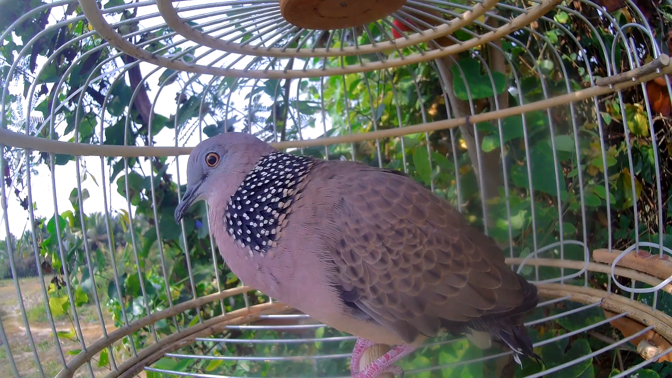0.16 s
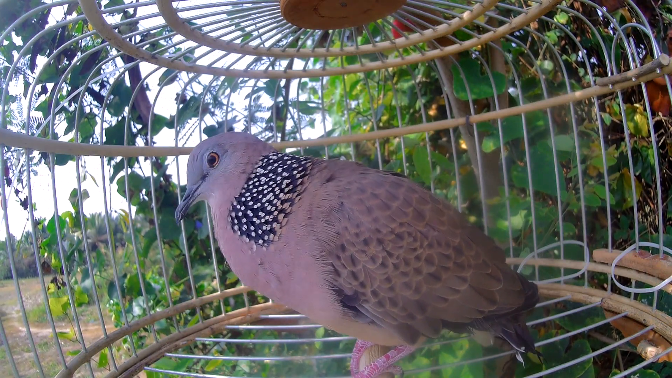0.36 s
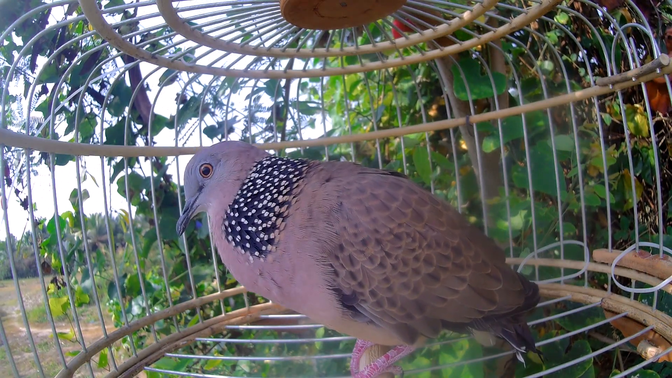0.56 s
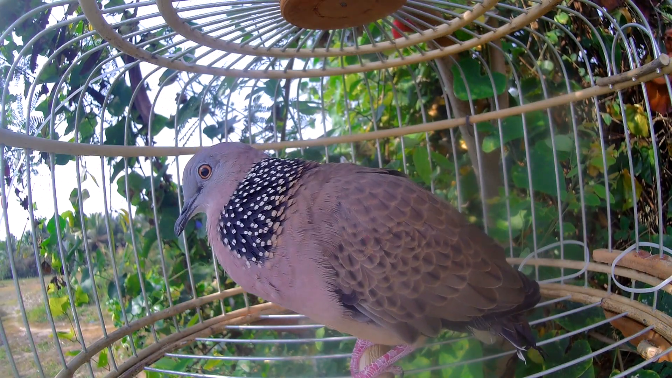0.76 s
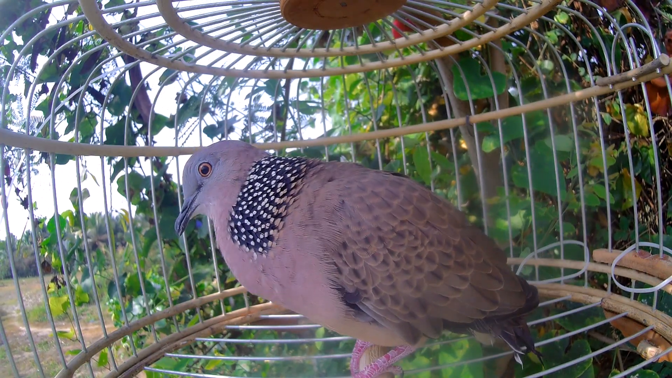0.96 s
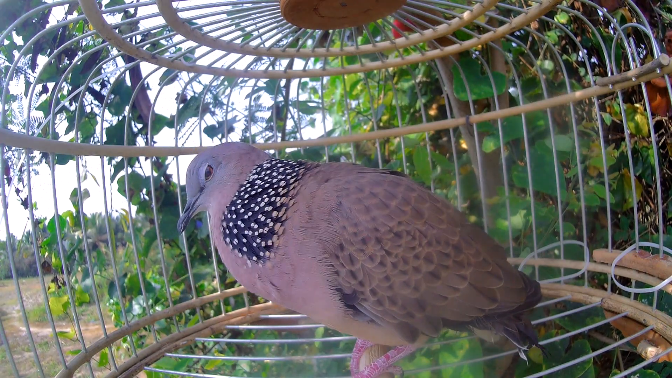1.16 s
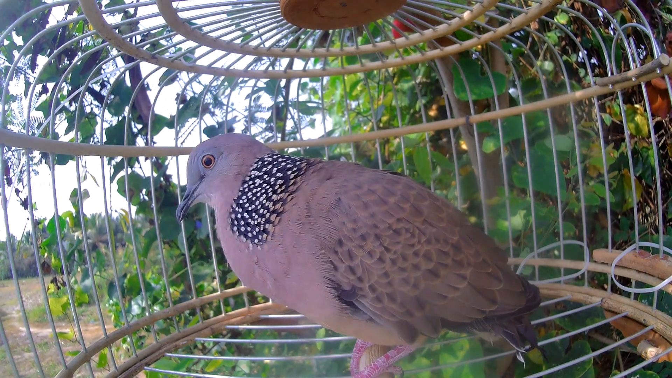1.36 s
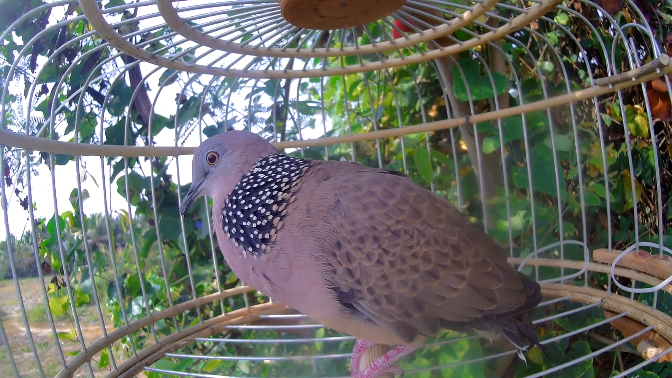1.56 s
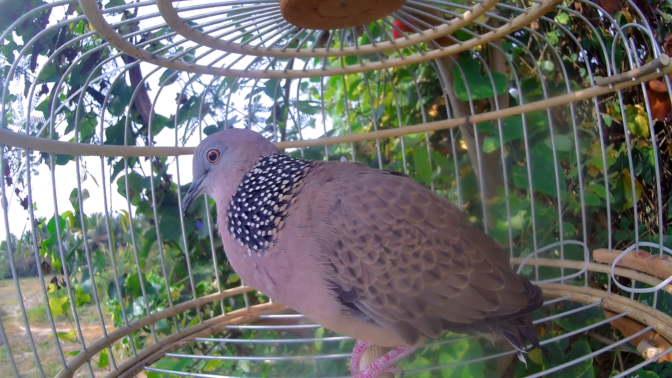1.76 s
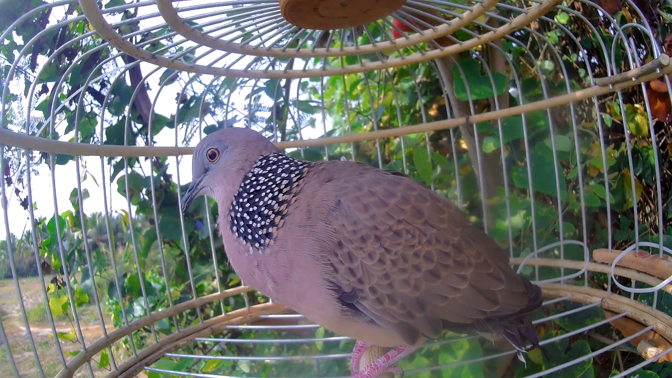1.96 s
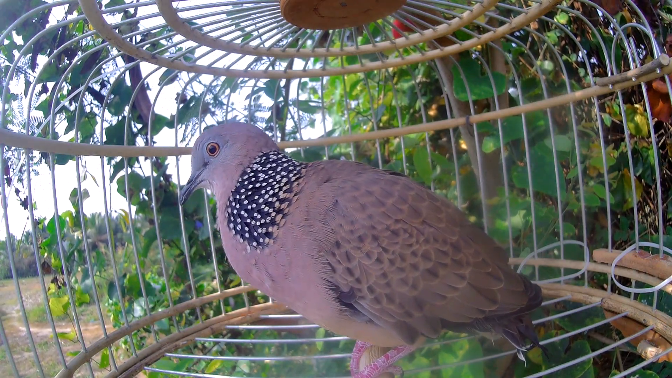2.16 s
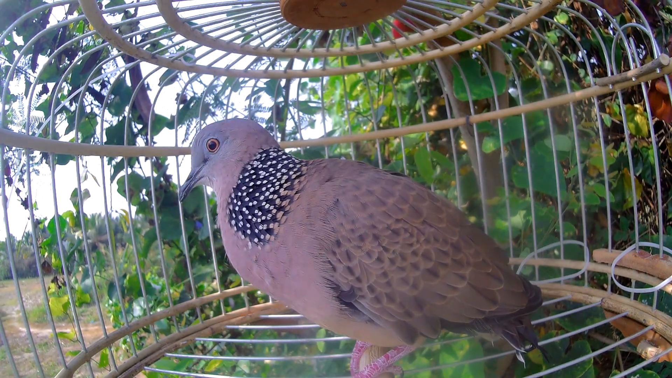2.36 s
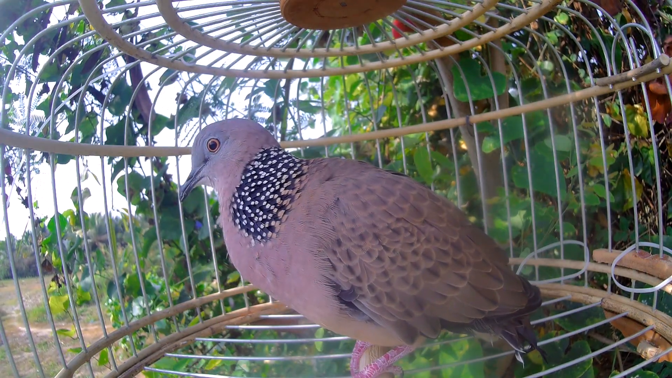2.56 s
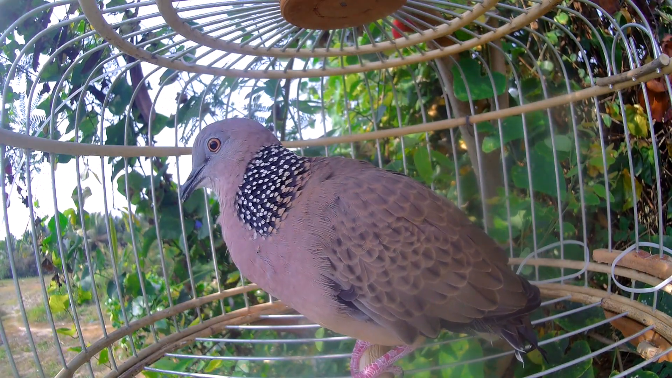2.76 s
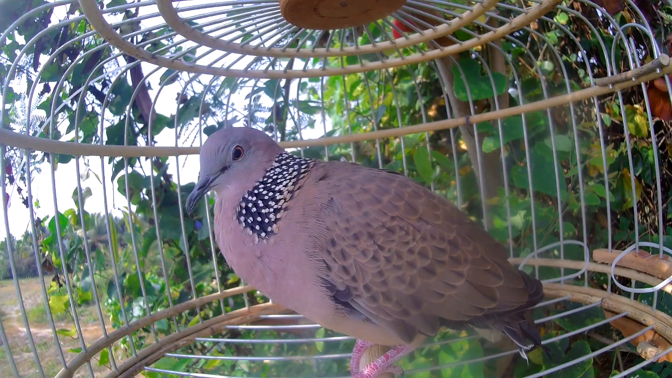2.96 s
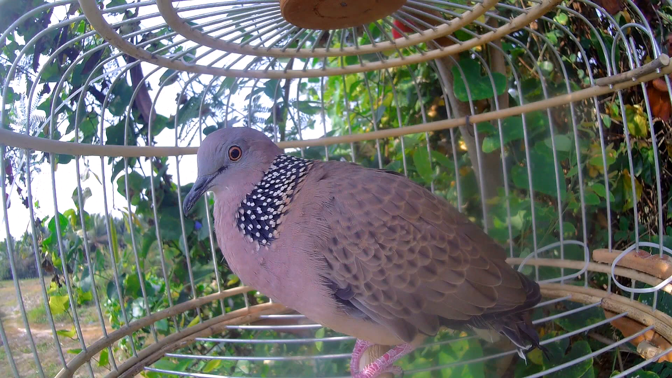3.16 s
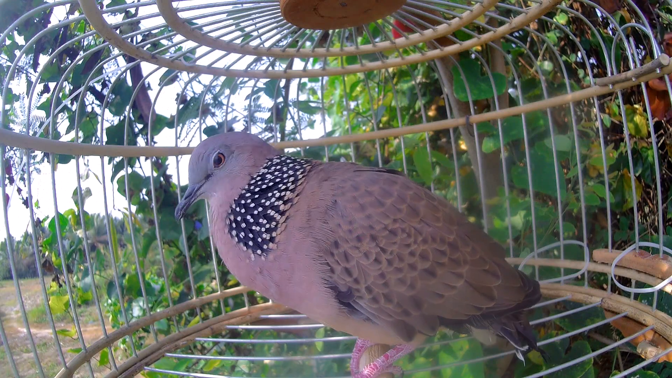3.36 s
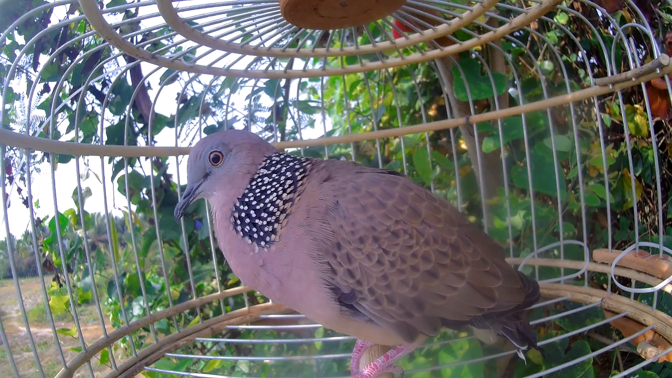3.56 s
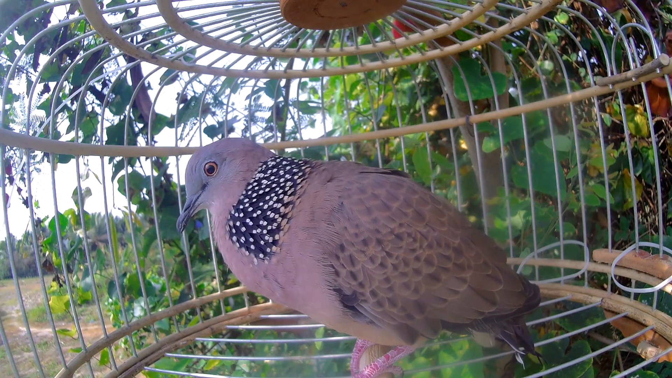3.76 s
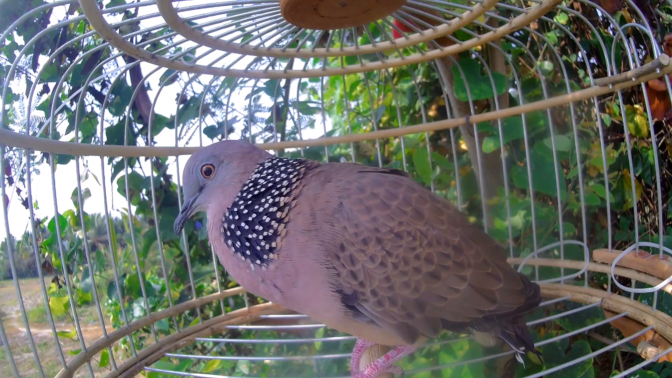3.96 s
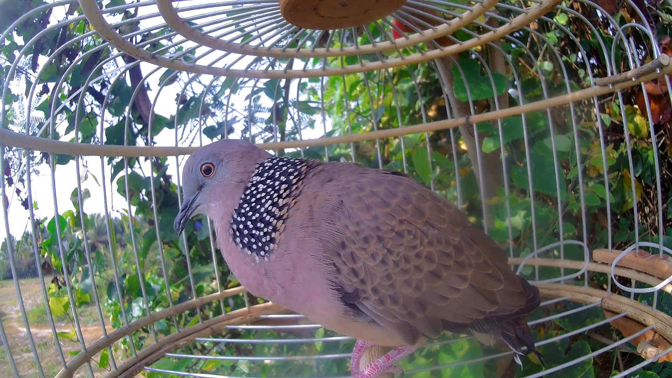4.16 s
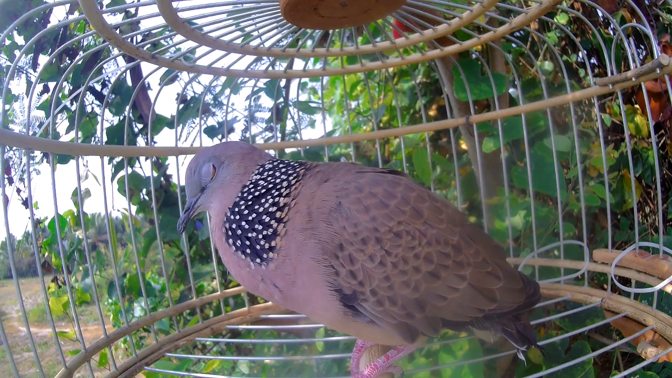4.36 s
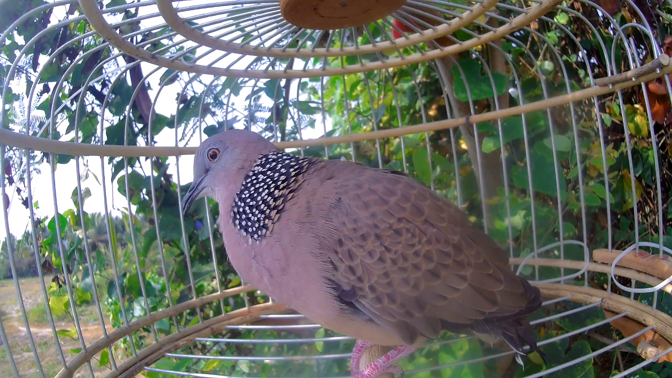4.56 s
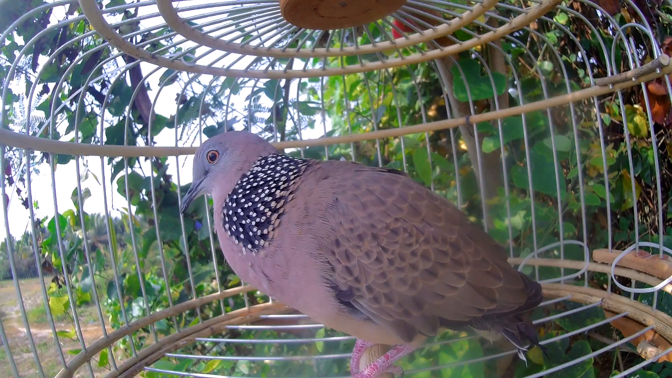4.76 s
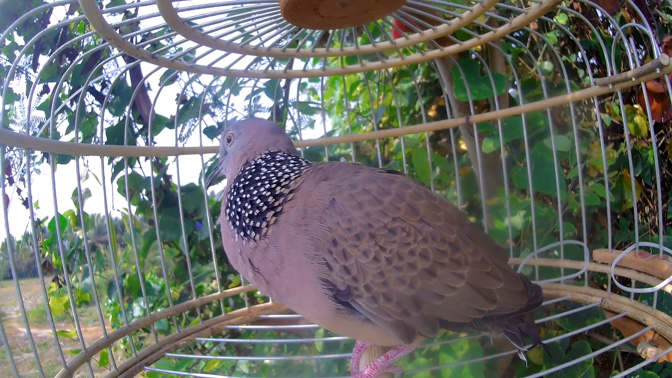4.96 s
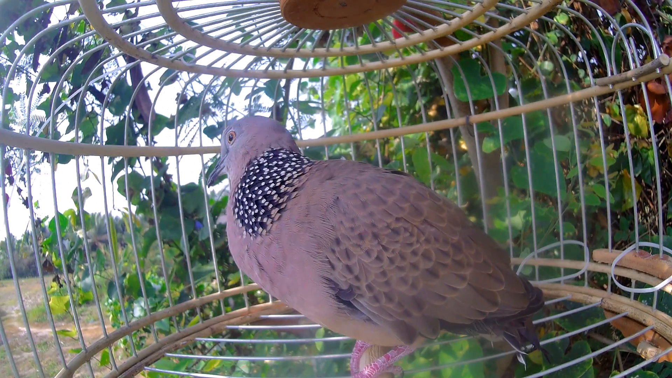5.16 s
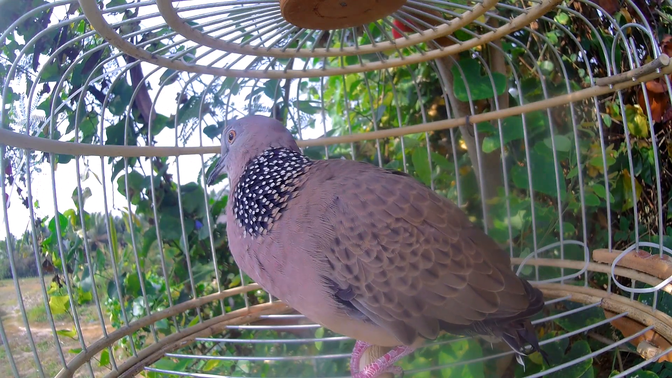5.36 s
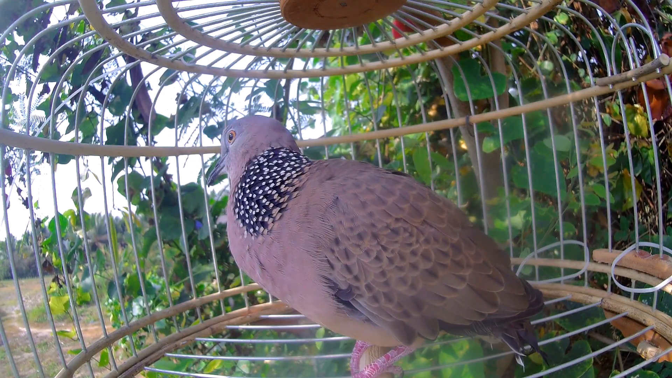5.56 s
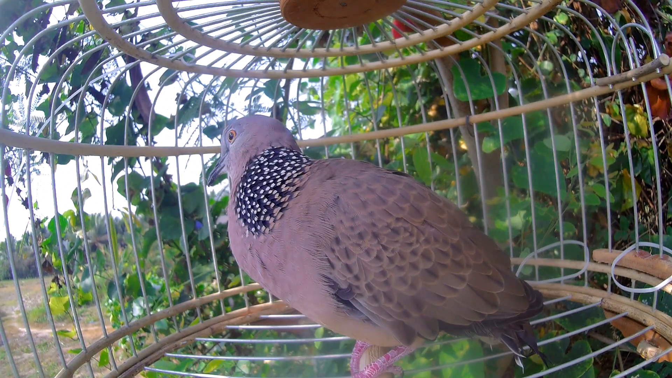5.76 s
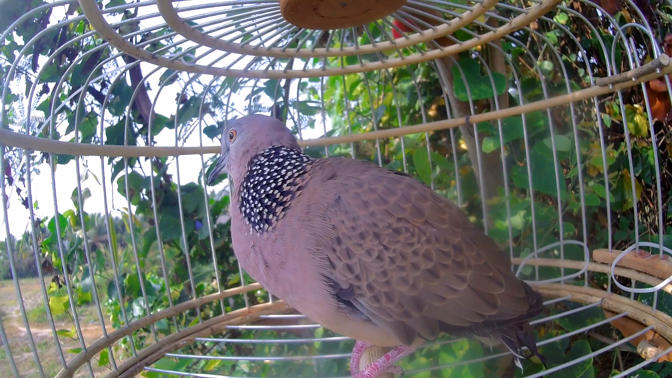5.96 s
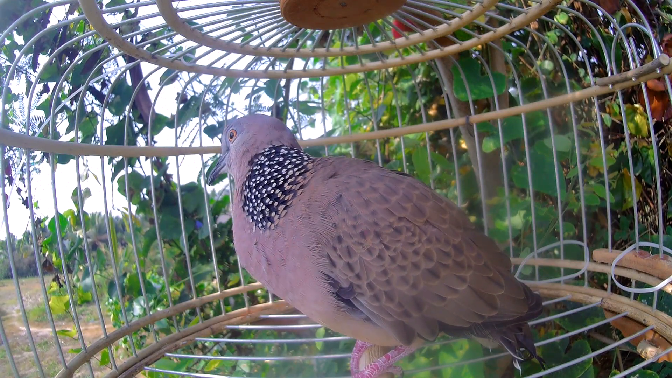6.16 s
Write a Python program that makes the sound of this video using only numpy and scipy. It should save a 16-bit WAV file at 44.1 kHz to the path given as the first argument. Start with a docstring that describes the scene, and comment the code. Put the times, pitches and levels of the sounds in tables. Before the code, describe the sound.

A dove in a garden cage coos two phrases close to the microphone. Each has a short coo, a stuttering roll that quickens into a falling note, and two more short coos. A second dove answers faintly from far away. In the second half, small birds add soft chips, thin whistles and peeps. Two tiny wire taps and a barely audible distant engine sit in a quiet outdoor hiss.

```python
"""A spotted dove coos two phrases close by in a garden cage: stuttered pulses quicken into falling notes.
A valve chops its voice, and its inflated crop radiates an almost pure tone that sinks with the pressure.
A small bird chips down four times from both sides of its syrinx; another whistles faintly upward.
Stray peeps and two taps on the cage wire come between. Far away a second dove answers and an engine
revs, over a quiet outdoor hiss."""
import sys
import numpy as np
from scipy import signal
from scipy.fft import rfft, irfft, next_fast_len
from scipy.io import wavfile
from scipy.ndimage import map_coordinates

SR = 44100
rng = np.random.default_rng(int(sys.argv[2]) if len(sys.argv) > 2 else 0)


def wav_out(sig):
    """Save sig, one row per channel (or a flat mono array), as 16-bit PCM at SR to the path in sys.argv[1]."""
    wavfile.write(sys.argv[1], SR, np.round(np.clip(np.atleast_2d(sig).T, -1, 1) * 32767).astype(np.int16))


N = 273417
TIME = np.arange(N) / SR
FULL_HZ, SLACK_HZ = 665.3, 499.5  # dove at full strength above; pressure gone
LEAD_S, EDGE_S = .015, 0.0061  # margin around a pulse; fade of a long note


def dove(cage_db=-31.5, near_db=-34, garden_db=-46, crop_hz=320):
    """The near dove, too small to radiate much bass, with echoes from cage, surroundings and garden."""
    song = rolls() + coos() + catches() + clucks()
    song = filtered(song, lambda hz: 1 - 1 / (1 + (hz / crop_hz) ** 6))
    cage = amp(cage_db) * echo(song, t60_s=.07)[:N]
    near = amp(near_db) * echo(song, t60_s=.18)[:N]
    garden = amp(garden_db) * echo(song, t60_s=1.0)[:N]
    return song + cage + near + garden


# rolled coos: (start [s], pitch factor, trill spacing [s], stutter length [s], quickening [pulses])
ROLLS = [(0.2911, 0.99, .0189, .35, 3.15), (3.4852, 0.99, .0186, .365, 3.16)]
# fall of a roll: (time from onset [s], base pitch [Hz])
ROLL_PITCH = [(0, 788), (.07, 805), (.17, 781), (.29, 760), (.36, 709), (.39, 665), (.432, 598), (.47, 542),
              (.49, 490)]
def rolls(first_gap_s=.0652, first_pulse_s=0.027, trill_pulse_s=0.013, stutter_db=-5.5, trill_db=-7.5):
    """The valve chops one falling note into ever shorter, quicker, duller pulses, then stays open."""
    stutter_overtones_db, trill_overtones_db = (-28, -46, -44.5), (-31, -47, -50)
    rises_s = (0.0078, 0.011, .0086)  # first, second, later pulses
    out = np.zeros(N)
    for start, factor, trill_gap_s, stutter_s, quicken_pulses in ROLLS:
        hz = factor * curves(ROLL_PITCH)[0]
        t, k = 0, 0
        while t < stutter_s:
            worn = 1 - np.exp(-(k / 3.2) ** 2)
            length_s = between(first_pulse_s, trill_pulse_s, worn)
            db = between(stutter_db, trill_db, worn)
            overtones_db = between(stutter_overtones_db, trill_overtones_db, worn)
            note = pulse(length_s, rises_s[min(k, 2)], hz[round(t * SR)], db, overtones_db)
            add(out, start + t - LEAD_S, note)
            t += between(trill_gap_s, first_gap_s, np.exp(-(k / quicken_pulses) ** 2))
            k += 1
        t -= EDGE_S
        fall = long_note(hz[round(t * SR):], octave_db=-32.5, slack_octave_db=-9.5,
                         twelfth_db=-57.5, whistle_db=-47.5)
        add(out, start + t, fall)
    return out


# long coos: (start [s], length [s], rise [s], crest delay [s], arch top [Hz], collapse [s],
# octave [dB], slack octave [dB], twelfth [dB], throat whistle [dB])
COOS = [(0.0, 0.12, 0.0047, 0.032, 772.7, 0.0064, -28.5, -11.5, -46, -44.5),
        (1, .15, 0.0029, 0.013, 740.6, 0.015, -35, -10.5, -36, -48.5),
        (1.386, 0.14, 0.0044, 0.029, 739, 0.0098, -52.5, -11.5, -59, -49),
        (3.1568, .16, .016, .081, 769.8, 0.0081, -32, -14.5, -50.5, -49),
        (4.204, .152, .003, 0.01, 742.3, .014, -39, -8, -37.5, -47.5),
        (4.603, 0.14, 0.0034, .045, 731.6, .012, -53.5, -13, -61, -48.5)]
def coos(sag_hz_per_s2=7000, scoop_hz=213, release_s=.0095):
    """Each note scoops up, arches, and collapses as the pressure runs out."""
    out = np.zeros(N)
    for start, length_s, rise_s, crest_s, top_hz, collapse_s, *overtones_db in COOS:
        t = np.arange(0, length_s + release_s, 1 / SR)
        arch_hz = top_hz - sag_hz_per_s2 * (t - crest_s) ** 2 - scoop_hz * np.exp(-t / rise_s)
        spent = np.exp(np.minimum(0, t - length_s) / collapse_s)
        add(out, start, long_note(between(arch_hz, SLACK_HZ, spent), *overtones_db))
    return out


# catches of the voice: (start [s], length [s], rise [s], pitch [Hz], level [dB])
CATCHES = [(0.9581, 0.017, 0.019, 688, -10), (.984, .014, .013, 761, -7.5), (1.367, 0.015, 0.018, 615, -18),
           (2.843, .023, .02, 718.4, -8.5), (2.907, .0155, 0.0054, 576, -21.5),
           (4.1626, .016, .021, 676, -12.5), (4.188, 0.014, 0.0072, 758, -7.5),
           (4.5843, .015, 0.022, 608, -19)]
def catches(octave_db=-39.5, twelfth_db=-35, whistle_db=-48.5):
    """Short pulses lead into a coo; the octave keeps its level however weak the pulse."""
    out = np.zeros(N)
    for start, length_s, rise_s, hz, db in CATCHES:
        overtones_db = (octave_db - db, twelfth_db, whistle_db)
        add(out, start - LEAD_S, pulse(length_s, rise_s, hz, db, overtones_db))
    return out


# valve clucks: (start [s], level [dB])
CLUCKS = [(.2547, -33), (.9407, -33.5), (1.1545, -32.5), (1.533, -39), (2.795, -41), (3.448, -34),
          (4.752, -29)]
def clucks():
    """Tiny pulses as the valve opens or shuts around a note."""
    out = np.zeros(N)
    for start, db in CLUCKS:
        note = pulse(length_s=0.0021, rise_s=0.0025, hz=650.8, db=db, overtones_db=(-18.5, -33, -43))
        add(out, start - LEAD_S, note)
    return out


def long_note(hz, octave_db, slack_octave_db, twelfth_db, whistle_db):
    """Pitch stands for pressure: as it sinks the tone fades and croaks, and its overtones stand out."""
    t = np.arange(len(hz)) / SR
    slack = np.clip((FULL_HZ - hz) / (FULL_HZ - SLACK_HZ), 0, 1)
    push_db = 1.8 * np.exp(-t / .015)
    waver_db = 1.37 * wobble(46, len(hz))
    croak_db = 3.5 * slack ** 4 * wobble(400, len(hz))
    db = between(-6, -27, slack) + push_db + waver_db + croak_db
    voice = dove_voice(hz, between(octave_db, slack_octave_db, slack),
                       between(twelfth_db, -25, slack), between(whistle_db, -49.5, slack))
    return faded(amp(db) * voice, EDGE_S)


def pulse(length_s, rise_s, hz, db, overtones_db, fall_s=0.0061, knock_db=-31):
    """The valve opens with a knock and snaps shut; the pitch scoops up and the level overshoots."""
    t = np.arange(-LEAD_S, length_s + LEAD_S, 1 / SR)
    gate = ramp(t / rise_s) * ramp((length_s - t) / fall_s)
    scoop = 1 - 0.2 / (1 + np.exp((t - .0015) / (0.21 * rise_s)))
    droop = 1 - .04 * ramp((t - length_s + .003) / .007)
    overshoot_db = 2.5 * np.exp(-((t - .005) / .006) ** 2)
    octave_db, twelfth_db, whistle_db = overtones_db
    whistle_db = whistle_db - 12 * (1 - gate)  # the throat whistle needs full pressure
    voice = dove_voice(hz * scoop * droop, octave_db, twelfth_db, whistle_db)
    knock = valve_knock(np.maximum(0, t + rise_s / 2))
    return amp(db) * (gate * amp(overshoot_db) * voice + amp(knock_db) * knock)


def valve_knock(t, ring_hz=1200, life_s=0.002):
    """The sudden opening gives the air in the throat one small knock."""
    return t / life_s * np.exp(1 - t / life_s) * np.sin(2 * np.pi * ring_hz * t)


# throat response: (frequency [Hz], gain [dB])
THROAT_RESPONSE = [(1700, -20.5), (2300, 3), (2850, -2), (3400, -22.5), (4400, -24), (5100, -6.5),
                   (5600, 5.5), (5950, -6.5), (6400, -26.5), (9000, -27)]
def dove_voice(hz, octave_db, twelfth_db, whistle_db, husk_db=-52):
    """The crop radiates an almost pure tone; high overtones light up as they cross throat resonances."""
    phase = phase_of(hz * (1 + .0045 * wobble(200, len(hz))))
    tone = np.sin(phase) + amp(octave_db) * np.sin(2 * phase) + amp(twelfth_db) * np.sin(3 * phase)
    k = np.arange(4, 10)[:, None]
    rolloff_db = -3.0 * np.maximum(0, k - 7) ** 2
    whistle = np.sum(amp(along(THROAT_RESPONSE, k * hz) + rolloff_db) * np.sin(k * phase), axis=0)
    # turbulence grains the overtones and fills the gap between tone and octave
    grain = 1 + .45 * wobble(400, len(hz))
    husk = wobble(800, len(hz)) * np.sin(1.5 * phase)
    return tone + amp(whistle_db) * grain * whistle + amp(husk_db) * husk


# chips: (start [s], gain [dB], pitch factor, echo [dB], rasp [dB])
CHIPS = [(3.309, -37.5, 0.96, -8, -16.5), (4.223, -34.5, 0.98, -8.5, -14), (5.171, -32, 0.97, -7, -28),
         (5.804, -35.5, 0.94, -1.5, -22.5)]
# the two sides of the syrinx: (time from onset [s], base pitch [Hz], relative level [dB])
CHIP_FALLING = [(0, 4700, -22.5), (.011, 4856, -12.5), (.017, 5150, -7.5), (.022, 5516, -6.5),
                (.028, 4684, -18.5), (.036, 4723, -1), (.052, 4270, -7.5), (.064, 3205, -5.5),
                (.072, 3618, -9.5), (.082, 3600, -1.5), (.102, 3030, -4.5), (.112, 2758, -12),
                (.16, 2394, -33.5)]
CHIP_RISING = [(.002, 2094, -30), (.018, 2586, -21), (.032, 3700, -17), (.042, 4300, -24)]
def chips():
    """A small bird's buzzy chips: one side of the syrinx falls, the other rises to meet it."""
    out = np.zeros(N)
    for start, db, factor, echo_db, rasp_db in CHIPS:
        for contour in (CHIP_FALLING, CHIP_RISING):
            note = amp(db) * bird_note(contour, factor, buzz=0.049, rasp_db=rasp_db)
            add(out, start, note)
            add(out, start, amp(echo_db) * echo(note, t60_s=0.2))
    return out


# whistles: (start [s], relative level [dB], pitch factor)
WHISTLES = [(3.0, -64, 0.98), (4.442, -55, 0.94), (4.728, -56.5, 0.95), (4.939, -54, 0.95),
            (5.411, -53, .99), (5.646, -51.5, 1.1), (6.085, -51, 1.08)]
# one whistle: (time from onset [s], base pitch [Hz], relative level [dB])
WHISTLE_CONTOUR = [(0, 2920, 1.5), (.018, 3580, -1), (.042, 4415, -3), (.06, 4700, 0.5), (.08, 4480, -19.5)]
def whistles(gain_db=-7):
    """Thin rising whistles, scattered by the trees."""
    out = np.zeros(N)
    for start, db, factor in WHISTLES:
        note = bird_note(WHISTLE_CONTOUR, factor, buzz=.015, rasp_db=-19)
        add(out, start, amp(db + gain_db) * echo(note, t60_s=0.066))
    return out


def bird_note(contour, factor, buzz, rasp_db, buzz_hz=290, octave_db=-23):
    """A whistle roughened by a fast flutter of pitch and level, and spread wide by a rasp."""
    hz, db = curves(contour)
    n = len(hz)
    flutter = np.sin(phase_of(buzz_hz * (1 + 0.36 * wobble(120, n))))
    bend = 1 + buzz * (flutter + .5 * wobble(700, n))
    phase = phase_of(factor * hz * bend)
    rasp = amp(rasp_db) * wobble(4400, n)
    tone = np.sin(phase) + amp(octave_db) * np.sin(2 * phase)
    return faded(amp(db) * (1 + 10 * buzz * flutter + rasp) * tone, edge_s=.003)


# peeps: (start [s], length [s], first pitch [Hz], last pitch [Hz], relative level [dB])
PEEPS = [(1.97, 0.027, 5200, 5100, -53), (1.977, 0.1, 2680, 3430, -59), (2.03, 0.029, 4960, 4940, -49),
         (4.555, 0.064, 2730, 2890, -48.5), (5.302, 0.024, 1544, 1936, -43.5),
         (5.696, 0.061, 2700, 3070, -50), (5.745, 0.049, 4810, 4600, -47.5),
         (5.863, 0.025, 5230, 4400, -41), (5.908, 0.023, 5600, 5100, -41.5),
         (6.144, 0.054, 2295, 3160, -46.5)]
def peeps(gain_db=-5):
    """Stray sliding peeps, scattered by the trees."""
    out = np.zeros(N)
    for start, length_s, first_hz, last_hz, db in PEEPS:
        note = glide(length_s, first_hz, last_hz, edge_s=0.0027, waver=0.05)
        add(out, start, amp(db + gain_db) * echo(note, t60_s=0.085))
    return out


# distant coos: (start [s], length [s], first pitch [Hz], last pitch [Hz], level [dB])
FAR_COOS = [(1.645, 0.14, 731, 743, -45), (1.879, 0.22, 790, 715.5, -45.5), (2.07, 0.2075, 761, 615, -43.5),
            (4.424, 0.31, 734, 763, -45), (5.61, 0.1, 703, 720, -53), (5.859, 0.228, 797, 765, -49.5),
            (6.025, 0.17, 754, 702, -53)]
def far_dove(crop_hz=730, half_band_hz=140):
    """Rough notes blurred by echoes; only the band of the crop's resonance carries this far."""
    out = np.zeros(N)
    for start, length_s, first_hz, last_hz, db in FAR_COOS:
        note = glide(length_s, first_hz, last_hz, edge_s=.025, waver=.025)
        wash = echo(note, t60_s=0.25)
        add(out, start, amp(db) * wash * np.linalg.norm(note) / np.linalg.norm(wash))
    return filtered(out, lambda hz: 1 / (1 + ((hz - crop_hz) / half_band_hz) ** 4))


def glide(length_s, first_hz, last_hz, edge_s, waver):
    """A soft, hoarse sliding tone."""
    n = int(length_s * SR)
    hz = np.linspace(first_hz, last_hz, n) * (1 + waver * wobble(170, n))
    hoarseness = .7 + .7 * wobble(500, n)
    return faded(hoarseness * np.sin(phase_of(hz)), edge_s)


# taps: (time [s], level [dB])
CAGE_TAPS = [(1.632, -48), (5.29, -50.5)]
# wire response: (frequency [Hz], gain [dB])
WIRE_RESPONSE = [(1000, -21.5), (3000, -4.5), (5500, 8.5), (7000, 5), (12000, -20.5)]
def cage_taps(t60_s=.035):
    """Light taps on the cage wire die at once."""
    out, t = np.zeros(N), np.arange(SR // 10) / SR
    for start, db in CAGE_TAPS:
        add(out, start - .002, amp(db - 60 * t / t60_s) * rng.standard_normal(len(t)))
    return filtered(out, lambda hz: amp(along(WIRE_RESPONSE, hz)))


# revs: (time [s], firing rate [Hz], relative level [dB])
ENGINE_REVS = [(0, 166.5, -62.5), (0.251, 162.6, -61), (0.601, 167, -52), (.85, 163.8, -62.5),
               (1.102, 169.5, -62), (1.55, 146.5, -69.5), (1.93, 147.2, -77), (2.101, 163, -63),
               (2.36, 164.6, -64), (2.661, 179, -69.5), (2.92, 148.3, -62.5), (3.1, 161.6, -67.5),
               (3.45, 170, -60), (4.05, 173.6, -62), (4.449, 146, -69), (4.95, 181.2, -63),
               (5.401, 147.9, -85), (6.2, 145.4, -88.5)]
# engine colour: (frequency [Hz], gain [dB])
ENGINE_COLOUR = [(150, -22), (600, -16.5), (950, 4.5), (1150, -8), (1450, -1), (1620, -5), (2300, -18)]
def engine(gain_db=1.5):
    """A small engine far off: its orders slide with the revs and fade in and out on the air."""
    times, firing_hz, db = np.transpose(ENGINE_REVS)
    phase = phase_of(np.interp(TIME, times, firing_hz))
    orders = 0
    for k in range(5, 12):
        order_db = along(ENGINE_COLOUR, k * firing_hz) + 1.2 * rng.standard_normal(len(times))
        orders += np.interp(TIME, times, amp(order_db)) * np.sin(k * phase)
    return np.interp(TIME, times, amp(db + gain_db)) * unit(orders)


# outdoor and microphone hiss: (frequency [Hz], relative density [dB])
AIR_SPECTRUM = [(25, -8.5), (60, -5), (110, -3.5), (250, -1), (400, -7.5), (650, -6.5), (1000, -9),
                (1500, -13), (2300, -14), (3300, -18.5), (4800, -16), (6200, -21), (9000, -42.5)]
MIC_SPECTRUM = [(4000, -22), (6500, -9), (7550, 1.5), (8150, -5.5), (8600, -1), (9050, -5), (9500, 3.5),
                (9950, -2.5), (10700, 1), (11800, -13), (13700, -11), (14550, 1), (15300, -21)]
def background(air_db=-56.5, mic_db=-64.0, rumble_db=-70.7):
    """Steady outdoor hiss, a swelling low rumble and the microphone's own noise."""
    swell = amp(rumble_db + 4 * wobble(1.9, N))
    rumble = noise([(10, -7.5), (28, -8.5), (60, -6.5), (86, -1.5), (120, -15.0), (400, -61.0)])
    return amp(air_db) * noise(AIR_SPECTRUM) + swell * rumble + amp(mic_db) * noise(MIC_SPECTRUM)


def echo(x, t60_s):
    """Scatter from leaves and walls: a dying random tail."""
    t = np.arange(SR) / SR
    tail = rng.standard_normal(SR) * amp(-60 * t / t60_s) * (1 - np.exp(-t / 0.0058))
    return signal.fftconvolve(x, tail / np.linalg.norm(tail))


def noise(spectrum):
    """Coloured noise of rms 1."""
    return unit(filtered(rng.standard_normal(N), lambda hz: amp(along(spectrum, hz))))


def amp(db):
    """Decibels to gain."""
    return 10 ** (np.asarray(db) / 20)


def unit(x):
    """x at rms 1."""
    return x / np.sqrt(np.mean(x ** 2) + 1e-20)


def between(a, b, share):
    """From a at share 0 to b at share 1."""
    return np.asarray(a) * (1 - share) + np.asarray(b) * share


def ramp(u):
    """Smooth step from 0 to 1, one unit wide, centred on 0."""
    return np.sin(np.pi / 2 * np.clip(u + .5, 0, 1)) ** 2


def along(points, hz):
    """(Hz, value) points read on a log axis."""
    knots_hz, values = np.transpose(points)
    return np.interp(np.log(hz + 1), np.log(knots_hz + 1), values)


def curves(rows):
    """One value per sample for each column after the time."""
    times, *columns = np.transpose(rows)
    return [np.interp(np.arange(times[0], times[-1], 1 / SR), times, c) for c in columns]


def wobble(rate_hz, n):
    """Smooth random curve of n samples, rate_hz knots a second."""
    knots = rng.standard_normal(int(n * rate_hz / SR) + 4)
    return map_coordinates(knots, [np.arange(n) * rate_hz / SR])


def phase_of(hz):
    """Running phase of a gliding tone."""
    return 2 * np.pi * np.cumsum(hz) / SR


def faded(x, edge_s):
    """x with soft ends."""
    return x * signal.windows.tukey(len(x), min(1, 2 * edge_s * SR / len(x)))


def add(track, start_s, x):
    """Mix x into the track."""
    i = max(0, round(start_s * SR))
    track[i:i + len(x)] += x[:max(0, N - i)]


def filtered(x, response):
    """x shaped by a gain function of frequency."""
    m = next_fast_len(N + SR // 2)
    return irfft(rfft(x, m) * response(np.fft.rfftfreq(m, 1 / SR)), m)[:N]


def limiter(x, ceiling_db, attack_s):
    """Gain control holds loud notes at one level; it lags, so their onsets overshoot."""
    pole = np.exp(-1 / (attack_s * SR))
    envelope = np.abs(signal.hilbert(x, next_fast_len(N))[:N])
    level = signal.lfilter([1 - pole], [1, -pole], envelope)
    return x / np.maximum(1, level / amp(ceiling_db))


def scene():
    """The near dove over the garden's background, in mono."""
    birds = dove() + chips() + whistles() + peeps() + far_dove()
    return (birds + cage_taps() + engine() + background())[None]


def record(dry, boost_db=1, top_hz=15680, dc_offset=-.0108):
    """The recorder boosts, limits loud notes, cuts the top band and adds a small constant offset."""
    held = limiter(amp(boost_db) * dry[0], ceiling_db=-5.5, attack_s=.003)
    return filtered(held, lambda hz: hz < top_hz)[None] + dc_offset


dry = scene()
out = record(dry)
wav_out(out)
```